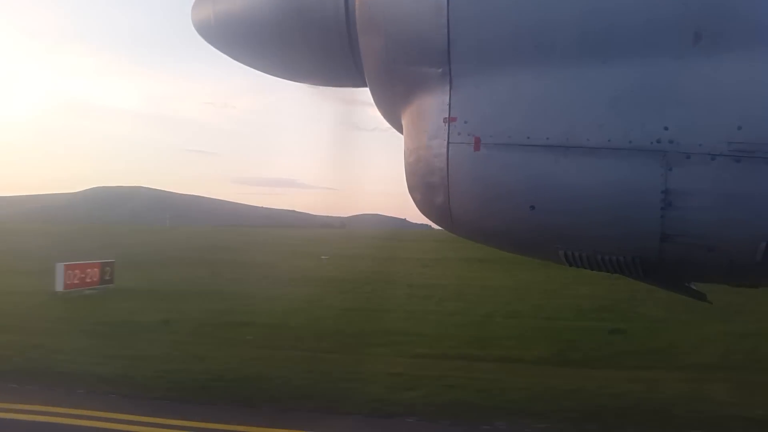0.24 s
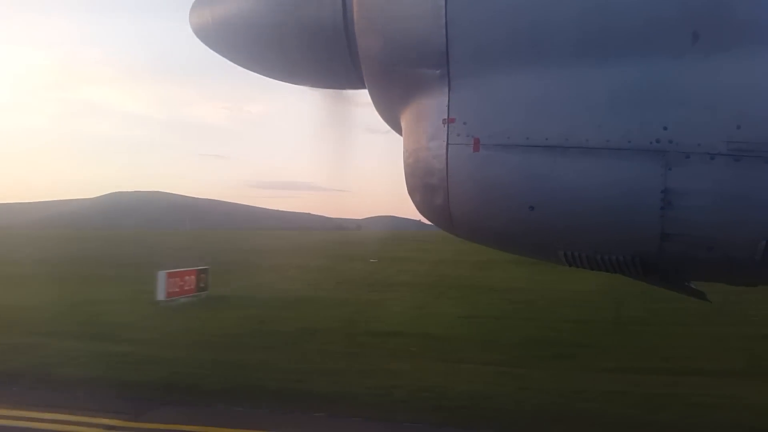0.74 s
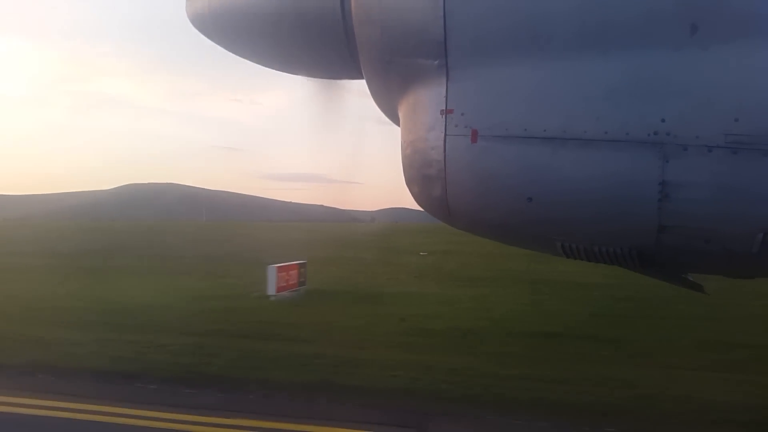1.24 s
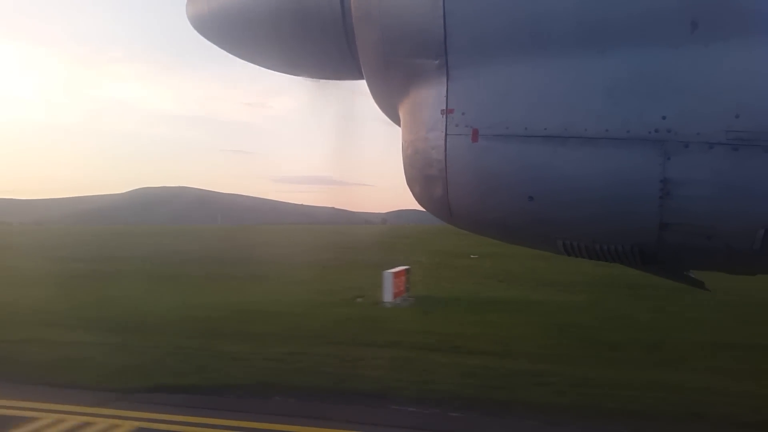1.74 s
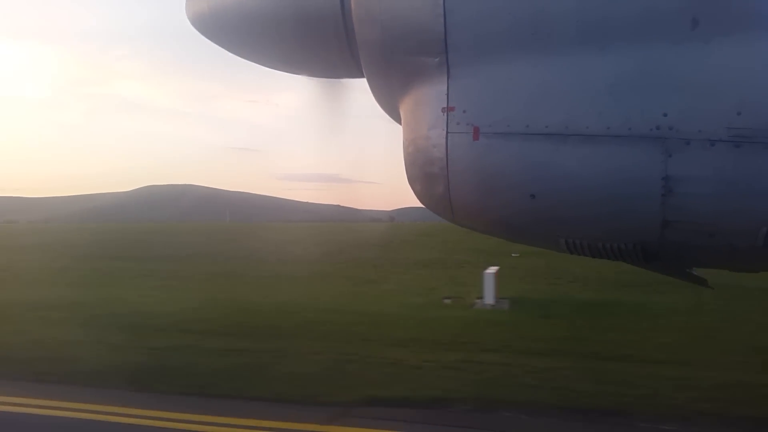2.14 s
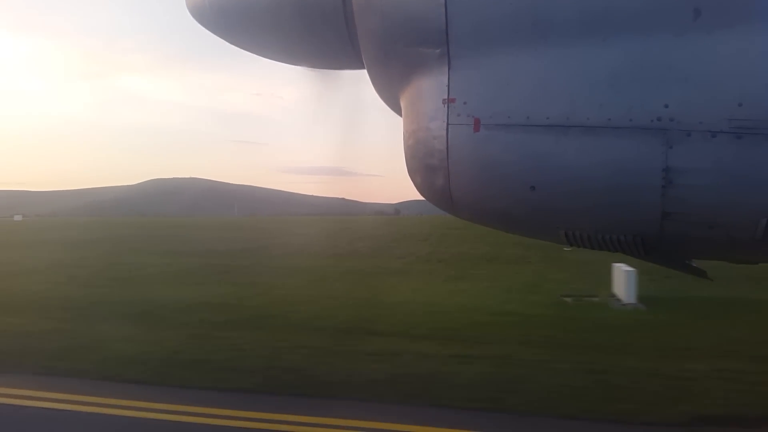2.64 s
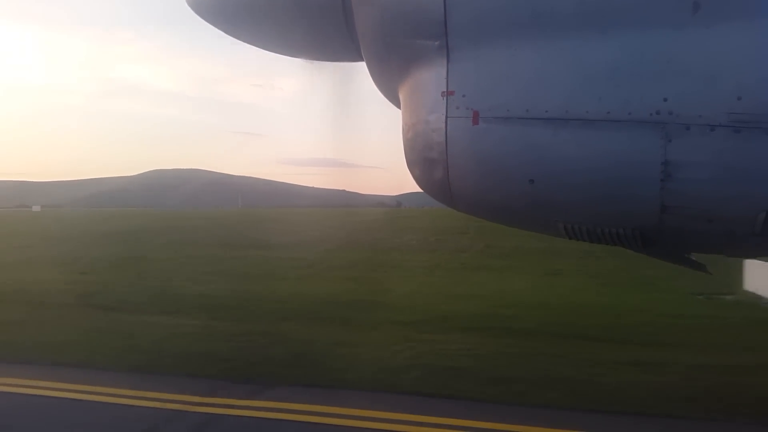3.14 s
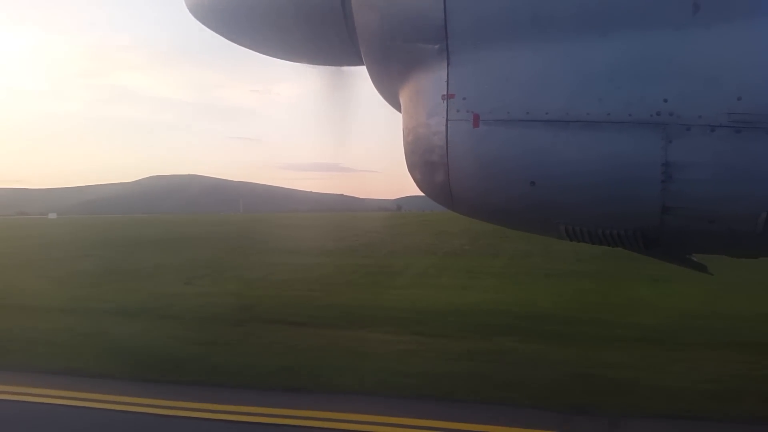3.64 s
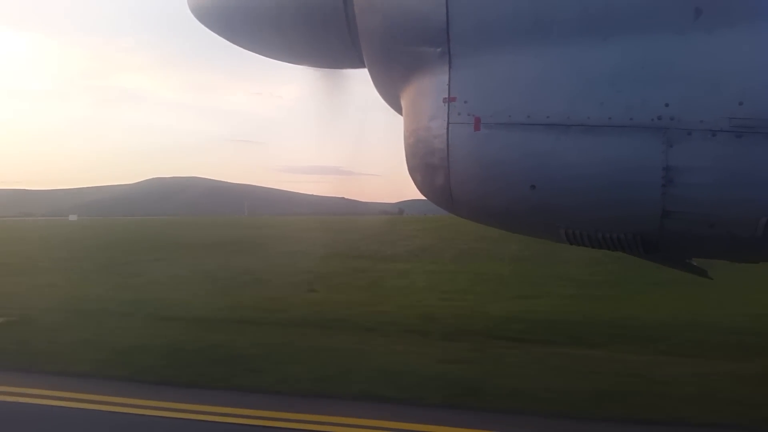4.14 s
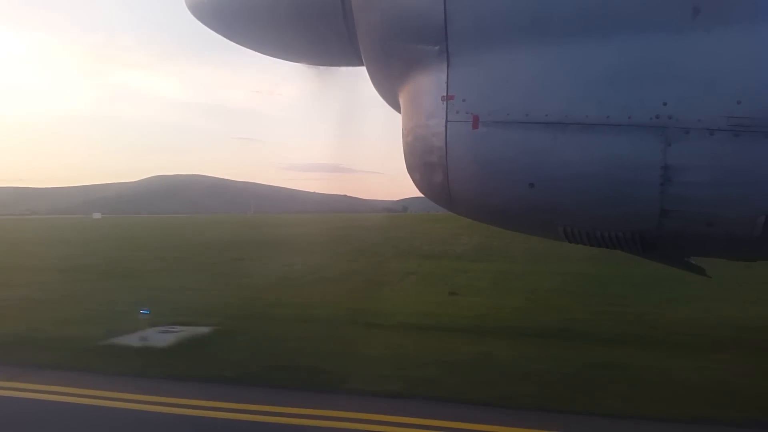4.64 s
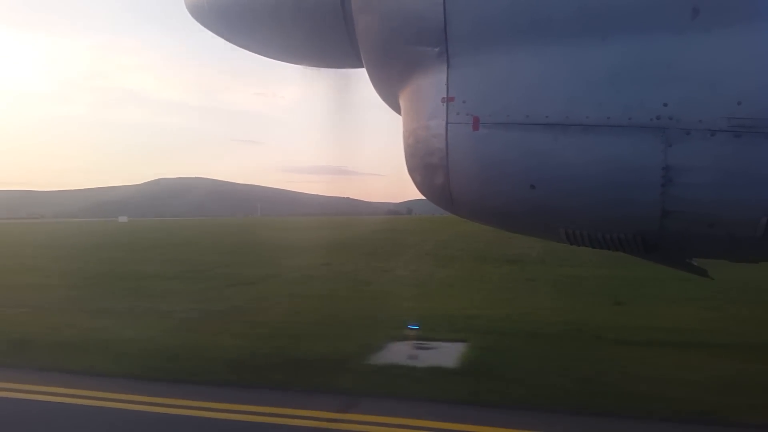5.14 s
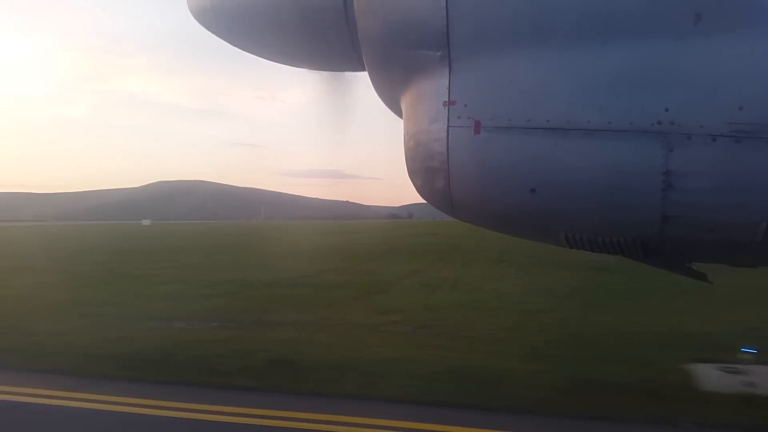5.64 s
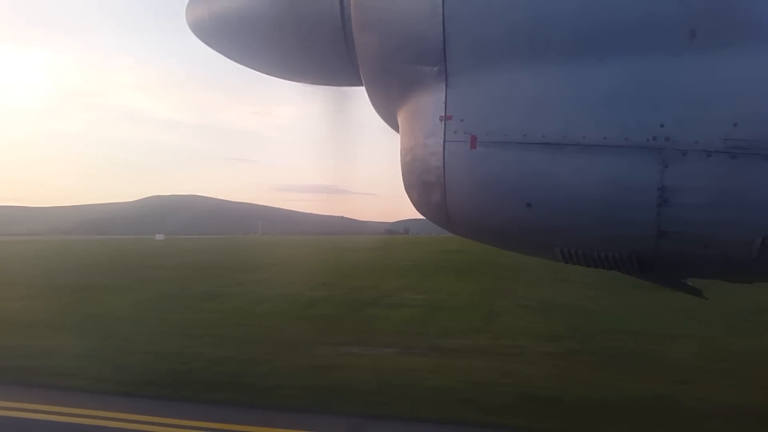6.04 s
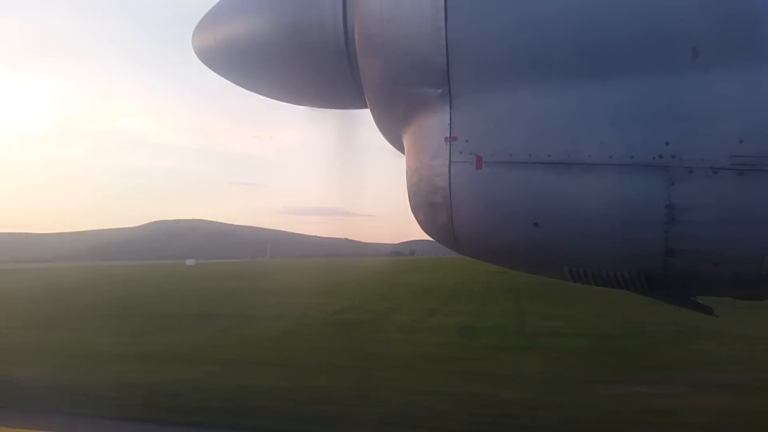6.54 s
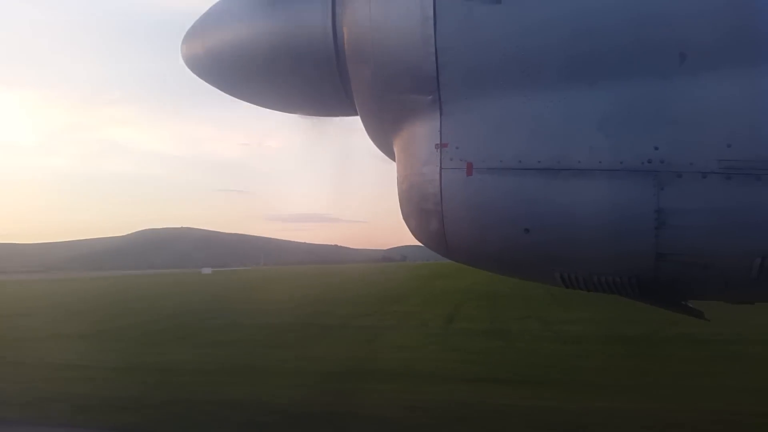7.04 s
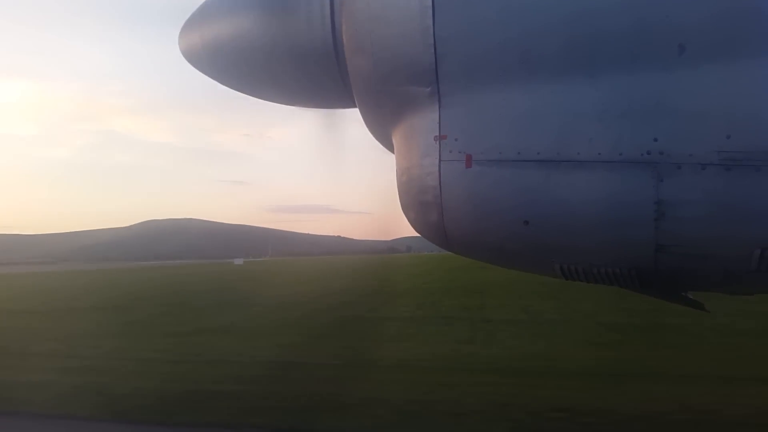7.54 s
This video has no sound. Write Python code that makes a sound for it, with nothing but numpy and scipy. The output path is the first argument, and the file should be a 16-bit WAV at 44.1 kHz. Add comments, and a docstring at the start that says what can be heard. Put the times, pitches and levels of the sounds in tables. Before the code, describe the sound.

The microphone is inside the cabin of a taxiing propeller plane, beside one engine, and the sound is already at full level at 0 seconds. A heavy low drone, with its strongest weight in the bass and low mids, throbs as two propellers drift in and out of step, roughly every two seconds at first. Rapid blade slaps blur into a buzzing wash that builds and drops with each beat. Above lie a thin, chopped turbine whine, faint gear tones, soft ventilation hiss and rolling rumble. A loose fitting ticks faintly, rattling harder briefly around 0.7, 1.5, 2.5, 5 and 5.7 to 6.3 seconds. From about 6.2 seconds the engines ease; drone and whine slide down in pitch. By 7.2 the blades growl, rough and lumpy, with stronger buffeting. A tiny high plastic squeak comes near 7.7, and it stops abruptly at 7.8.

```python
"""A throbbing drone: a twin turboprop taxis, heard from a window seat beside one engine.
Two four-bladed propellers turn at slightly different speeds, so their harmonics beat; each blade slaps the air.
A turbine whines in chopped sines, gears sing thinly, filtered noise hisses and rumbles, a resonant fitting ticks.
Near the end the engines slow a little, the blades flatten, stall and growl; last comes one trim squeak."""
import sys
import numpy as np
from scipy import signal
from scipy.fft import rfft, irfft, next_fast_len
from scipy.io import wavfile
from scipy.ndimage import uniform_filter1d, minimum_filter1d

SR = 44100
rng = np.random.default_rng(int(sys.argv[2]) if len(sys.argv) > 2 else 0)


def waveform_to_disk(signal):
    """Save audio, clipped to [-1, 1], as 16-bit WAV at the path in sys.argv[1]."""
    frames = np.transpose(np.atleast_2d(signal))
    scaled = np.clip(frames, -1, 1) * 32767
    samples = np.round(scaled).astype(np.int16)
    wavfile.write(sys.argv[1], SR, samples)


N = 343518
TIME = np.arange(N) / SR  # s

# Near propeller. Each row: time in seconds, blade passes per second.
NEAR_BLADE_RATE = [(0, 83.9), (4.9, 83.85), (5.9, 83.5), (6.25, 83.0), (6.6, 81.7), (7.0, 80.2),
                   (7.4, 78.5), (7.79, 76.8)]


def from_db(db):
    """Decibels to gain."""
    return 10 ** (np.asarray(db) / 20)


def rms_one(x):
    """Scale to unit rms."""
    return x / np.sqrt(np.mean(x ** 2) + 1e-20)


def in_time(rows):
    """Interpolate each column of a curve to every sample."""
    s, *columns = np.transpose(rows)
    return [np.interp(TIME, s, c) for c in columns]


def at_hz(points, hz):
    """Read a spectrum on a log-frequency axis."""
    f, value = np.transpose(points)
    return np.interp(np.log(hz + 1e-3), np.log(f), value)


def pan(left_db):
    """Left and right gains for a left-minus-right level, at equal power."""
    return rms_one(from_db(np.array([[left_db], [-left_db]]) / 2))


def tone(cycles):
    """A sine of unit rms."""
    return np.sqrt(2) * np.sin(2 * np.pi * cycles)


def drift(rate_hz):
    """Random wander of unit rms: white noise through two equal poles at rate_hz."""
    step, settle = 40, 2000  # computed every 40 samples; the filter's start-up is dropped
    r = np.exp(-2 * np.pi * rate_hz * step / SR)
    noise = rng.standard_normal(N // step + settle + 2)
    slow = signal.lfilter([1], [1, -2 * r, r * r], noise)[settle:]
    return np.interp(np.arange(N) / step, np.arange(len(slow)), rms_one(slow))


def resonate(x, hz, width_hz):
    """Two-pole resonance with gain 1 on top."""
    r = np.exp(-np.pi * width_hz / SR)
    zeros = np.array([1, 0, -1]) * (1 - r * r) / 2
    poles = [1, -2 * r * np.cos(2 * np.pi * hz / SR), r * r]
    return signal.lfilter(zeros, poles, x)


def chop(cycles, sharpness):
    """One smooth pulse per cycle, rms 1."""
    return rms_one(np.exp(sharpness * np.cos(2 * np.pi * cycles)))


def cabin_noise(colour):
    """Stereo noise, alike at both microphone ports in the bass, unrelated in the treble; mid rms 1."""
    # Each row: frequency in Hz, left-right correlation.
    likeness = [(40, .96), (85, .99), (250, .95), (400, .8), (650, .4), (1000, -.1), (2000, 0), (14000, 0)]
    # Each row: frequency in Hz, left minus right in dB.
    balance = [(80, 3.5), (300, 3), (700, -1), (1400, 2.5), (2800, 4.5), (4500, 15.5), (7000, 5.5),
               (8500, 7), (10000, -6), (14000, -7.5)]
    size = next_fast_len(N)
    hz = np.arange(size // 2 + 1) * SR / size
    mid, side = rfft(rng.standard_normal((2, size))) * from_db(at_hz(colour, hz))
    alike = np.clip(at_hz(likeness, hz), -.999, .999)
    signs = np.array([[1], [-1]])
    lean = from_db(signs * at_hz(balance, hz) / 2)
    ports = np.sqrt(1 + alike) * mid + signs * np.sqrt(1 - alike) * side
    out = irfft(ports * lean / np.hypot(*lean), size)[:, :N]
    return out / out.mean(0).std()


def cabin_echo(x, t60_s=0.035, wet=0.67):
    """Dense early reflections, different at each port, smear short pulses."""
    age_s = np.arange(SR // 12) / SR
    tail = rng.standard_normal((2, len(age_s))) * from_db(-60 * age_s / t60_s)
    tail /= np.linalg.norm(tail, axis=1, keepdims=True)
    echo = signal.fftconvolve(x[None], tail, axes=1)[:, :N]
    return np.sqrt(1 - wet) * x + np.sqrt(wet) * echo


def swell_db(lead, swells):
    """Level change as the two propellers' blades move in and out of step; row k crests k times per beat.

    A beat lasts while the lead grows by one blade pass."""
    return sum(depth_db * np.cos(2 * np.pi * k * (lead - place))
               for k, (depth_db, place) in enumerate(swells, 1))


def drone(near, far, stall, waver_db=0.44, boom_waver_db=2.0, boom_jitter=0.021, stall_jitter=0.08,
          port_lag=0.011):
    """Low harmonics of both propellers; each beats as one propeller gains on the other."""
    # Each row: multiple of the blade rate, near level in dB, far level in dB, phase of the far one
    # in cycles, change at full stall in dB.
    harmonics = [(0.498, -43.5, -57, .1, -7), (.75, -34.5, -58, 0.62, -19), (1, -15.5, -27, .72, -8.5),
                 (1.25, -33, -44, 0.14, -8), (1.5, -30, -29, 0.57, -11), (1.75, -34.5, -35, 0.38, -13),
                 (2, -19, -18.5, 0.51, -1), (2.25, -38.5, -41.5, 0.28, 5)]
    # Third harmonic, on a cabin resonance. One row: near level in dB, far level in dB,
    # phase of the far one in cycles, change at full stall in dB.
    boom_pair = (-14.5, -24.5, 0.64, -5)
    # Each row: depth either way in dB, place of the crest in the beat (0-1).
    boom_swells = [(1, 0.43), (1.25, 0.1)]
    boom_db = swell_db(near - far, boom_swells) + boom_waver_db * drift(8)
    # the propellers reach the ports from opposite sides
    ports = port_lag * np.array([[1], [-1]]) / 2  # blade passes
    near, far = near + ports, far - ports
    shake = stall_jitter * stall  # cycles

    def harmonic(order, near_db, far_db, phase, stall_db, gust):
        """One harmonic of both propellers, bent by the same gust."""
        near_tone = from_db(near_db) * tone(order * near + gust)
        far_tone = from_db(far_db) * tone(order * far + phase + gust)
        return (near_tone + far_tone) * from_db(stall_db * stall)

    out = harmonic(3, *boom_pair, (boom_jitter + shake) * drift(4)) * from_db(boom_db)
    for row in harmonics:
        out = out + harmonic(*row, shake * drift(3.4)) * from_db(waver_db * drift(4.4))
    return out * pan(-1.1)


def wash_level(lead, stall):
    """Wash strength in dB: builds through each beat and collapses, until the stalled blades take over."""
    # Each row: place in the beat (0-1), level in dB.
    beat = [(.05, -29.5), (0.281, -30), (.4, -28.5), (.54, -28), (.72, -26.5), (.8, -31.5), (.87, -32)]
    # Slow trend as power eases. Each row: time in seconds, change in dB.
    trend = [(0, 1.5), (1.5, 0), (3.5, .3), (5.8, 0.65), (6.5, -3.5), (7.79, -0.5)]
    full_stall_db = -19
    place, level_db = np.transpose(beat)
    taxi_db = np.interp(lead, place, level_db, period=1) + in_time(trend)[0]
    roar = stall ** 2
    return (1 - roar) * taxi_db + roar * full_stall_db


def buzz(near, stall, wash_db, waver_db=3.0, jitter=0.078, stall_jitter=0.095, port_spread=0.05, swell=0.79):
    """Higher blade harmonics swing more than the wash; gusts shake them, more so in stall."""
    # Each row: multiple of the blade rate, relative level in dB, change at full stall in dB.
    harmonics = [(4, -0.5, -1.5), (5, -1.5, -4.5), (6, -6, -12), (7, -11.5, 6), (8, -12.5, 1.5),
                 (9, -13.5, -5), (10, -12.5, -3.5), (11, -22, 4.5), (13, -22, -4.5), (14, -24.5, -7)]
    out = 0
    for order, level_db, stall_db in harmonics:
        cycles = order * near + (jitter + stall_jitter * stall) * drift(7) + rng.random()
        ports = np.array([[0], [port_spread * (-1) ** order]])  # cycles
        gain_db = level_db + stall_db * stall + waver_db * drift(6.4)
        out = out + tone(cycles + ports) * from_db(gain_db)
    extra_db = swell * (1.5 - stall) * (wash_db - np.median(wash_db))
    return out * from_db(wash_db - 2.0 + extra_db) * pan(2.0)


def wash(near, lead, stall, wash_db, gust_db=1.0, buffet_db=1.6):
    """Turbulent air slaps the fuselage once per blade and drums its panels; stalled blades buffet in lumps."""
    # Each row: frequency in Hz, relative density in dB per Hz.
    slap_colour = [(100, -46), (250, -2.5), (380, 3.5), (470, -3), (610, 4.5), (710, -5), (850, -0.5),
                   (980, -15), (1150, -9), (1500, -23.5), (2000, -31), (8000, -88)]
    # Each row: frequency in Hz, relative density in dB per Hz.
    drum_colour = [(60, -34), (110, -12.5), (150, 0.5), (190, -3.5), (220, -2), (270, 2.5), (305, 2),
                   (355, -6), (400, -18), (500, -15), (1200, -91)]
    # Each row: depth either way in dB, place of the crest in the beat (0-1).
    drum_swells = [(1.0, 0.47), (1.1, 0.0067)]
    taxi_drum_db, stall_drum_db = -21.5, 7.5  # level at taxi power, change at full stall
    slap_db = wash_db - 0.4 + buffet_db * stall * drift(25)
    slaps = cabin_noise(slap_colour) * chop(near, 0.24 + 0.23 * stall) * from_db(slap_db)
    drum_db = taxi_drum_db + stall_drum_db * np.sqrt(stall)
    drum_db = drum_db + swell_db(lead, drum_swells) + gust_db * drift(3.5)
    return slaps + cabin_noise(drum_colour) * chop(near, 0.077) * from_db(drum_db)


def whine(far, lead, sharpness=3.9, swing=0.065, rush_width_hz=200, wobble=0.17, flicker_db=2.05):
    """Compressor tones leave through the propeller, which chops and bends them into combs of sidebands."""
    # Each row: time in seconds, speed as a share of taxi speed, whine level in dB.
    turbine = [(0, 1, -1.5), (3.1, 1, .5), (5.5, .999, 0), (6.0, .996, -.5), (6.4, .982, -1),
               (6.7, .957, -2.5), (7.0, .932, -2.5), (7.35, .911, 1.5), (7.79, .89, -5)]
    # Each row: frequency at taxi speed in Hz, steady level in dB, blade-chopped level in dB,
    # level of the rush around it in dB, change as the turbine slows in dB.
    tones = [(6510, -71, -54, -60, 1), (6731, -49.5, -46.5, -52, -6.5), (7310, -88, -54, -61, -12),
             (8400, -85, -62, -64, 10), (13200, -95, -81, -67, 11.5)]
    # Each row: depth either way in dB, place of the crest in the beat (0-1).
    whine_swells = [(.3, 1), (.4, .06), (1.1, 0.033)]
    speed, level_db = in_time(turbine)
    turned_s = np.cumsum(speed) / SR  # seconds' worth of taxi speed
    slowing = np.clip((1 - speed) / .055, 0, 1)
    gate, soft_gate = chop(far, sharpness), chop(far, 0.85)
    steady, chopped = 0, 0
    for hz, steady_db, chopped_db, rush_db, slow_db in tones:
        cycles = hz * turned_s + wobble * drift(5.3)
        bent = cycles - swing * np.sin(2 * np.pi * far)
        # narrow-band noise: two random carriers a quarter cycle apart
        rush = drift(rush_width_hz) * tone(bent) + drift(rush_width_hz) * tone(bent + 1 / 4)
        rush = rush / np.sqrt(2)
        gain = from_db(slow_db * slowing + flicker_db * drift(2.1))
        steady = steady + gain * from_db(steady_db) * tone(cycles)
        chopped = chopped + gain * gate * from_db(chopped_db) * tone(bent)
        chopped = chopped + gain * soft_gate * from_db(rush_db) * rush
    return (steady + cabin_echo(chopped)) * from_db(level_db + swell_db(lead, whine_swells)) * pan(12)


def gears(near, flicker_db=2.5, wobble=0.1):
    """Thin reduction-gear tones, locked to the propeller shaft; they sink with it."""
    # Each row: frequency at taxi speed in Hz, relative level in dB.
    gear_tones = [(5814, -61.5), (8332, -63)]
    # Each row: time in seconds, change in dB.
    gear_level = [(0, 1), (3.6, -3), (4.4, 3), (5.9, 3), (6.6, 0), (7.79, -5)]
    turned_s = near / NEAR_BLADE_RATE[0][1]
    out = 0
    for hz, level_db in gear_tones:
        cycles = hz * turned_s + wobble * drift(4)
        out = out + tone(cycles) * from_db(level_db + flicker_db * drift(1.8))
    return out * from_db(in_time(gear_level)[0]) * pan(5.2)


def air(far, lead, stall):
    """Ventilation hiss, a leak that swells with the beat and flutters, and the rumble of rolling."""
    # Each row: frequency in Hz, relative density in dB per Hz.
    hiss_colour = [(600, 10.5), (1150, 11.5), (1550, 10.5), (1750, 3.5), (2000, 6.5), (2500, 0.5),
                   (2900, 3.5), (3500, -4), (5300, -9), (6500, -1), (7900, -2.5), (8800, 0), (10000, -3),
                   (11500, -8.5), (13200, -8), (15500, -32)]
    # Each row: frequency in Hz, relative density in dB per Hz.
    leak_colour = [(1500, -11), (3200, -7), (3900, 0), (4700, -1), (5400, -9.5), (7500, -11.5),
                   (10000, -6.5), (15000, -21)]
    # Each row: frequency in Hz, relative density in dB per Hz.
    rumble_colour = [(15, -14), (30, -15), (60, 8), (110, 7), (200, -31), (900, -94)]
    # Ventilation hiss. Each row: time in seconds, level in dB.
    vent_level = [(0, -42), (.5, -39.5), (3.3, -38), (7.79, -35)]
    # Each row: depth either way in dB, place of the crest in the beat (0-1).
    leak_swells = [(3.2, 0.28), (2.2, .12), (1.1, 0.049)]
    leak_taxi_db, leak_stall_db, rumble_db = -51, -9, -41.5  # leak: at taxi power, change at full stall
    opening_db = swell_db(lead, leak_swells) + leak_stall_db * stall
    vent_db = in_time(vent_level)[0] + 0.067 * opening_db + 0.5 * drift(7)
    vents = cabin_noise(hiss_colour) * chop(far, 0.15) * from_db(vent_db)
    leak_db = leak_taxi_db + opening_db + 1.2 * drift(30)
    leak = cabin_noise(leak_colour) * chop(far, 0.13) * from_db(leak_db)
    return vents + leak + cabin_noise(rumble_colour) * from_db(rumble_db)


def fitting(near, lead, ring_hz=9700, width_hz=600, scatter_db=0.8):
    """A loose fitting rings at each blade pass, hardest once per shaft turn; now and then it rattles harder."""
    # Each row: centre in seconds, length in seconds, rise in dB.
    rattles = [(.72, .08, 7.5), (1.45, .5, 3), (2.53, .1, 8), (5.0, .11, 9), (5.7, .55, 6.5),
               (6.25, .4, 5.5)]
    # Each row: depth either way in dB, place of the crest in the beat (0-1).
    fitting_swells = [(2.0, 0.53), (.8, 0.16)]
    quiet_db = -55.5  # between rattles, before the beat's swell
    knocks = chop(near, 1.7) * chop(near / 4, 1.0) * from_db(scatter_db * drift(25))  # four blades
    ring = resonate(knocks * rng.standard_normal(N), ring_hz, width_hz)
    ring = resonate(ring, ring_hz, 2 * width_hz)
    rattle_db = sum(rise_db * np.exp(-(2 * (TIME - s) / length_s) ** 2) for s, length_s, rise_db in rattles)
    return rms_one(ring) * from_db(quiet_db + swell_db(lead, fitting_swells) + rattle_db) * pan(-11)


def squeak(centre_s=7.672, hz=4750, level_db=-45, half_length_s=0.008):
    """Cabin trim, plastic on plastic, slips once: a short sine with a jittered phase."""
    slip = np.exp(-((TIME - centre_s) / half_length_s) ** 2)
    return from_db(level_db) * slip * tone(hz * TIME + 0.15 * drift(150)) * pan(8)


def scene():
    """Sum the layers; propeller phases in blade passes, their lead and the stall drive them."""
    # Lead of the near propeller over the far one. Each row: time in seconds, lead in blade passes.
    lead_curve = [(0, -.18), (.36, 0), (1.32, .5), (2.25, 1), (3.28, 1.5), (3.7, 1.75), (4.05, 1.87),
                  (4.54, 2), (5.05, 2.16), (5.5, 2.3), (6.0, 2.32), (6.34, 2.37), (6.52, 2.68),
                  (6.75, 2.81), (7.14, 2.88), (7.28, 3), (7.5, 3.2), (7.79, 3.33)]
    # Blade stall. Each row: time in seconds, share (0-1).
    stall_curve = [(0, 0), (6.2, 0.03), (6.9, 0.59), (7.1, 0.76), (7.25, 0.95), (7.55, 1), (7.79, 0.81)]
    near = np.cumsum(in_time(NEAR_BLADE_RATE)[0]) / SR
    lead = in_time(lead_curve)[0]
    far = near - lead
    stall = np.clip(in_time(stall_curve)[0], 0, 1)
    wash_db = wash_level(lead, stall)
    propellers = drone(near, far, stall) + buzz(near, stall, wash_db) + wash(near, lead, stall, wash_db)
    engines = propellers + whine(far, lead) + gears(near)
    return engines + air(far, lead, stall) + fitting(near, lead) + squeak()


def record(dry, ceiling=0.91, fade_s=0.0019, low_cut_hz=35, high_cut_hz=15600):
    """Fade the ends, drop the deepest bass, limit the tallest crests, cut the top."""
    fade = np.minimum(np.minimum(TIME, TIME[::-1]) / fade_s, 1)
    bass_cut = signal.butter(2, low_cut_hz, "high", fs=SR, output="sos")
    thin = signal.sosfilt(bass_cut, dry * fade)
    room = np.minimum(1, ceiling / (np.abs(thin).max(0) + 1e-9))
    hold = SR // 50  # 20 ms
    gain = minimum_filter1d(room, size=hold)
    for _ in range(2):
        gain = uniform_filter1d(gain, size=hold // 2)
    top_cut = signal.ellip(10, 0.1, 90, high_cut_hz, fs=SR, output="sos")
    return signal.sosfilt(top_cut, thin * gain)


dry = scene()
out = record(dry)
waveform_to_disk(out)
```